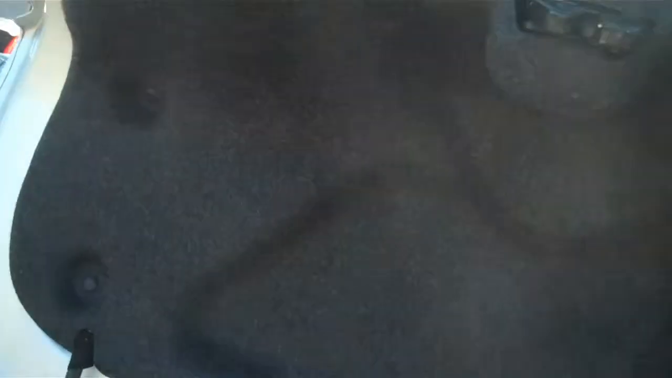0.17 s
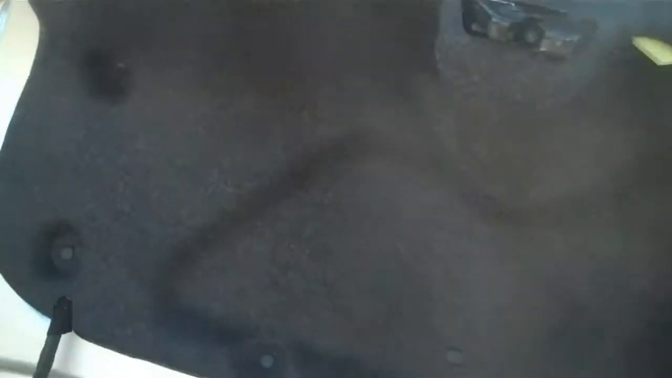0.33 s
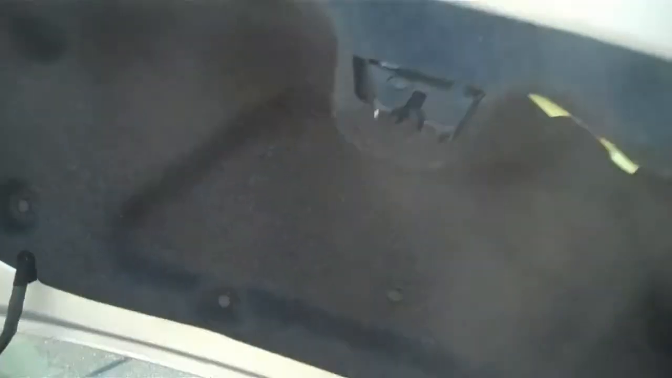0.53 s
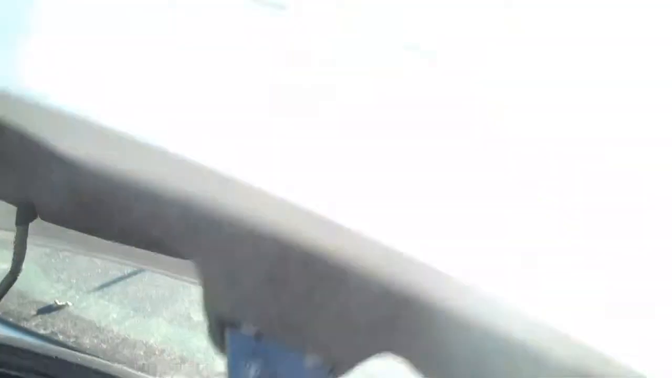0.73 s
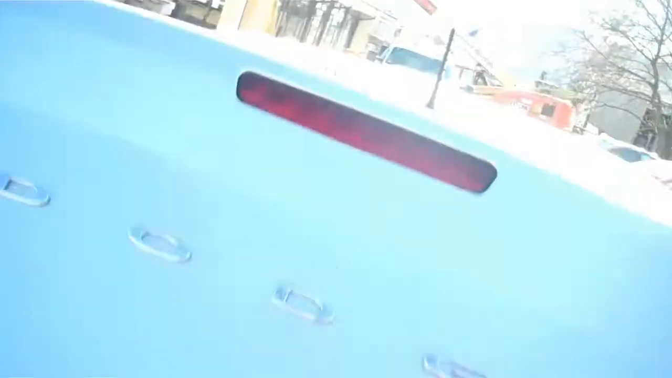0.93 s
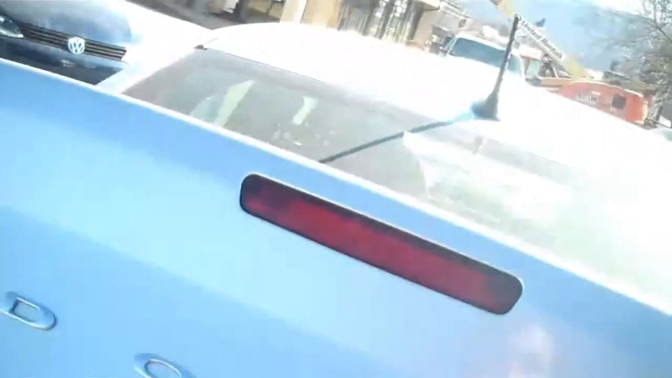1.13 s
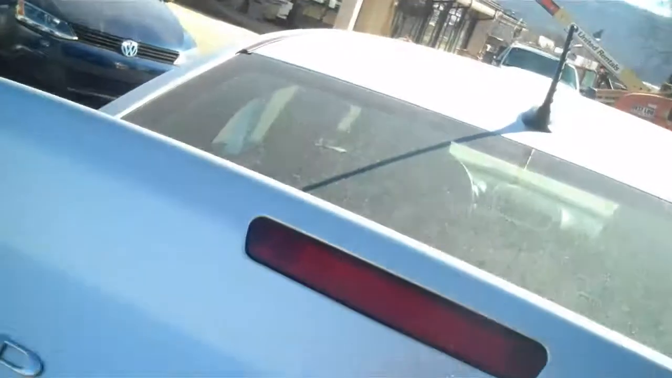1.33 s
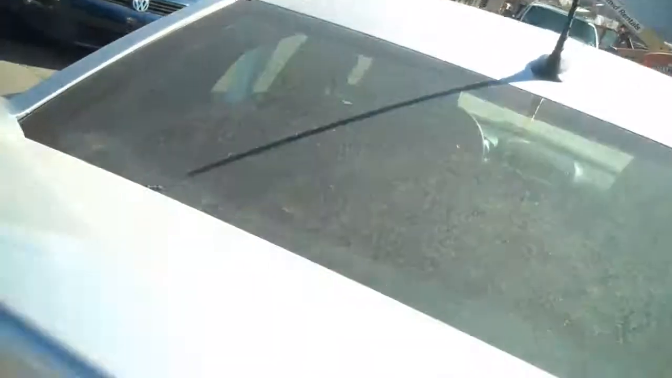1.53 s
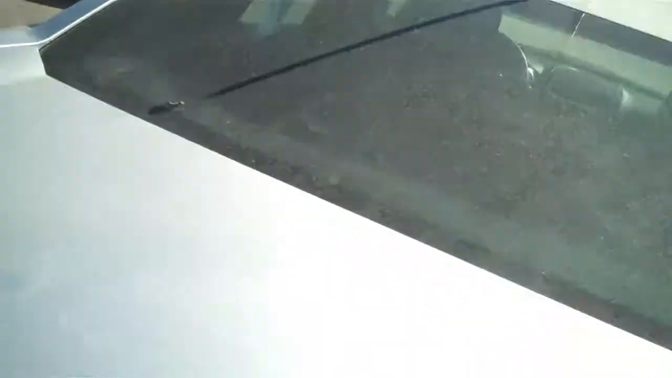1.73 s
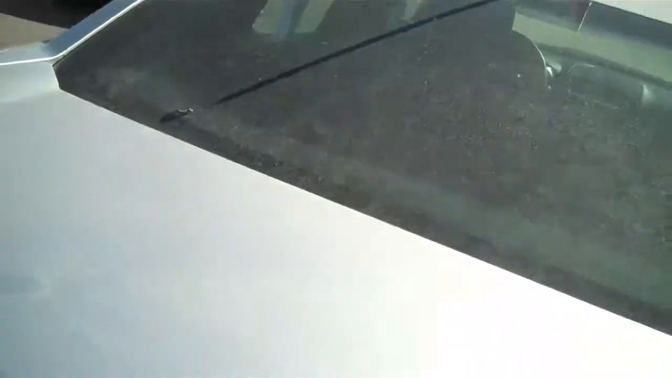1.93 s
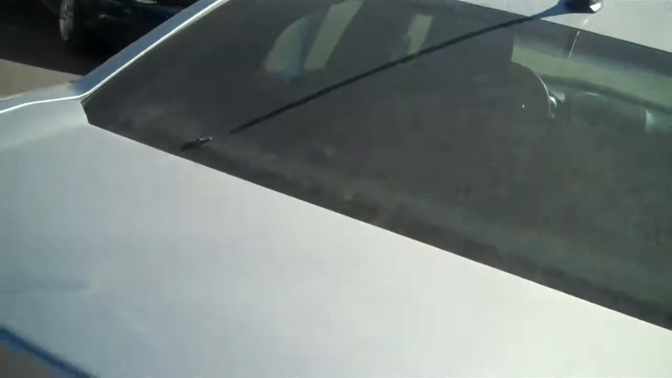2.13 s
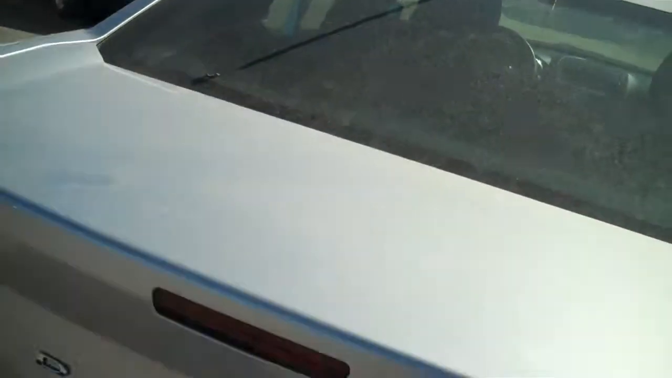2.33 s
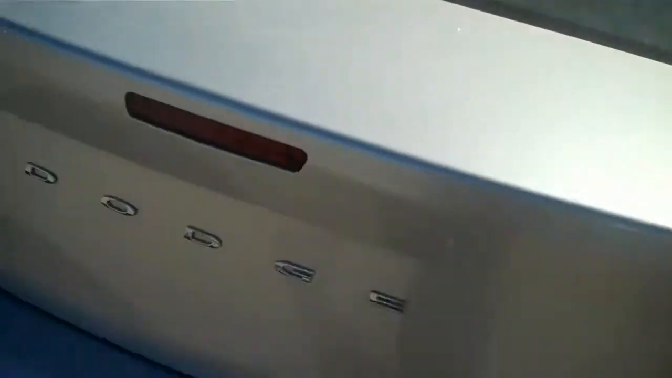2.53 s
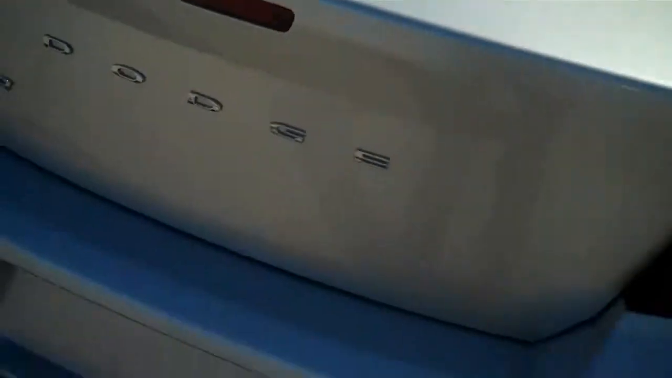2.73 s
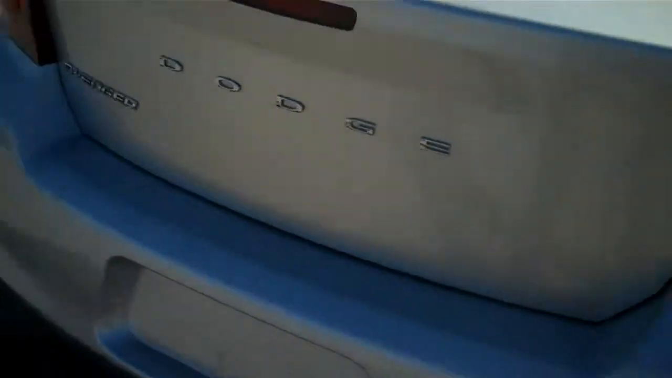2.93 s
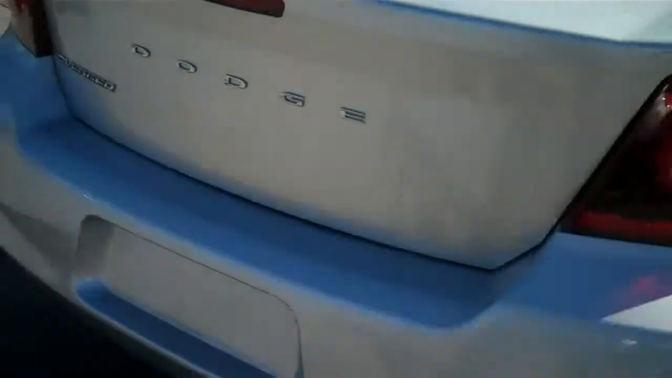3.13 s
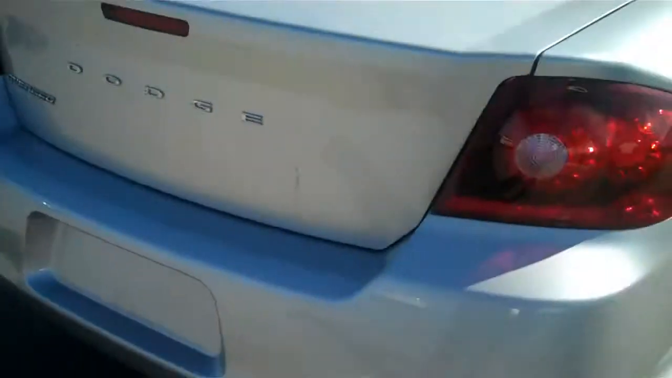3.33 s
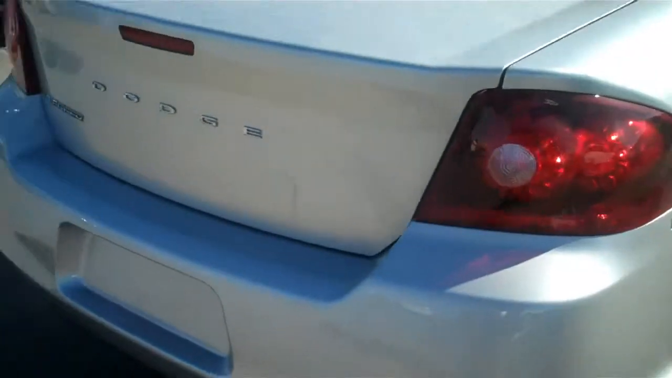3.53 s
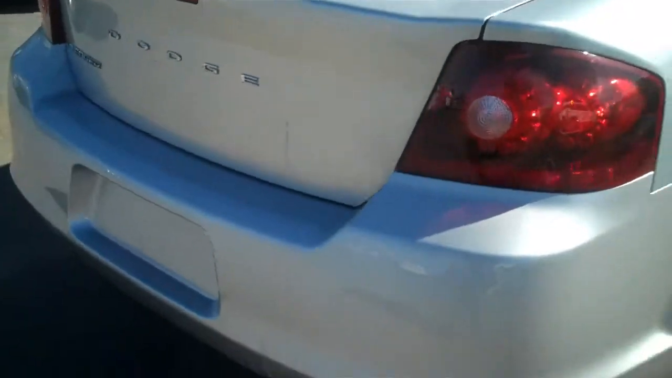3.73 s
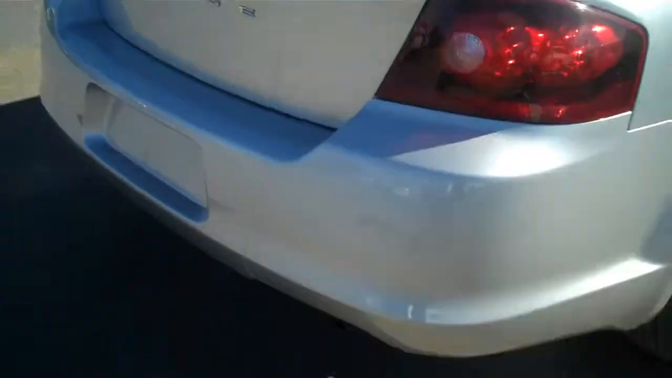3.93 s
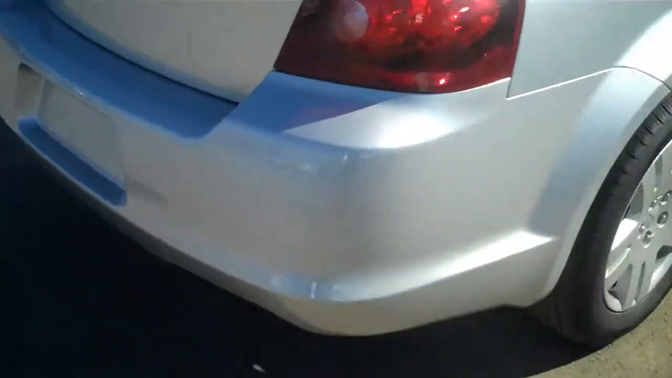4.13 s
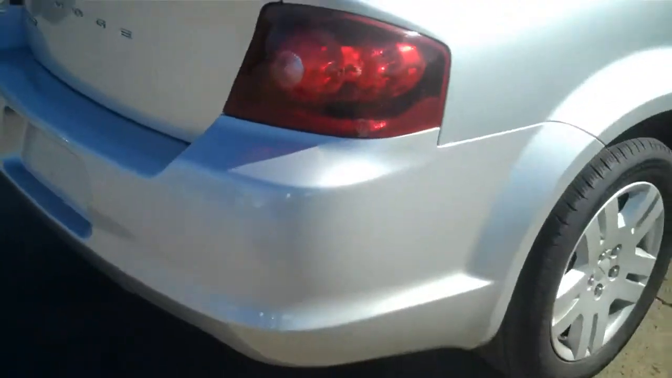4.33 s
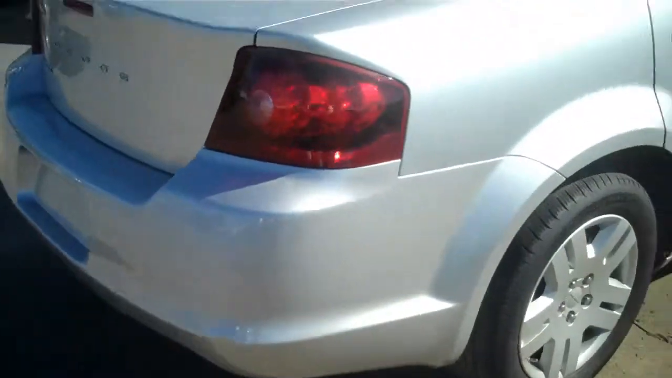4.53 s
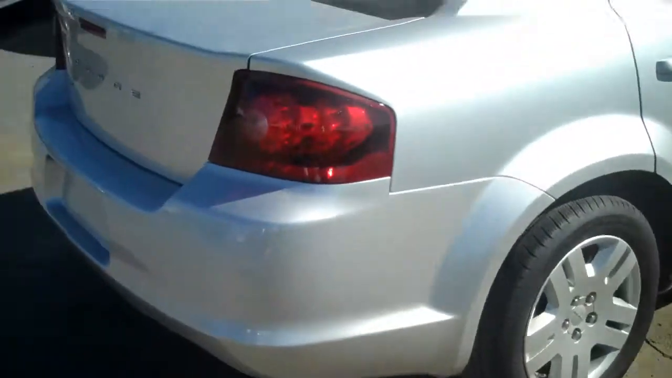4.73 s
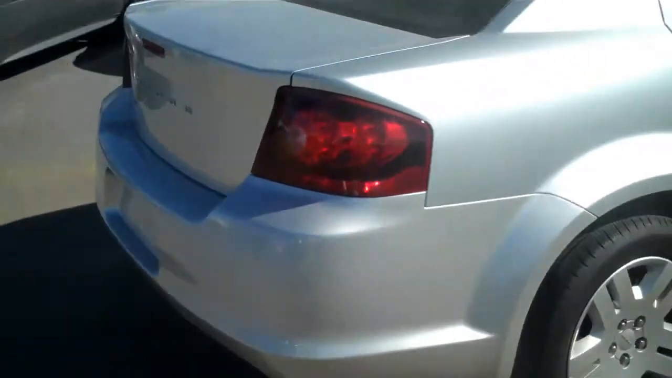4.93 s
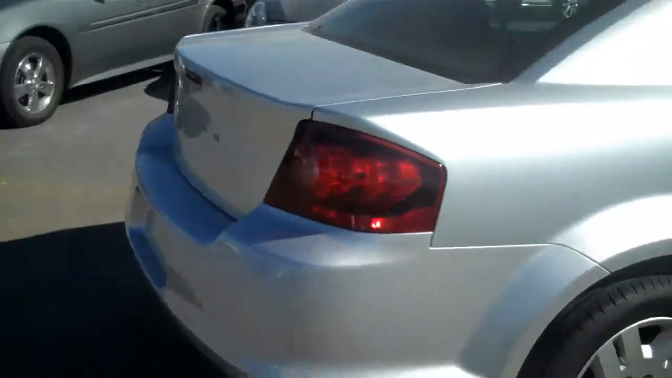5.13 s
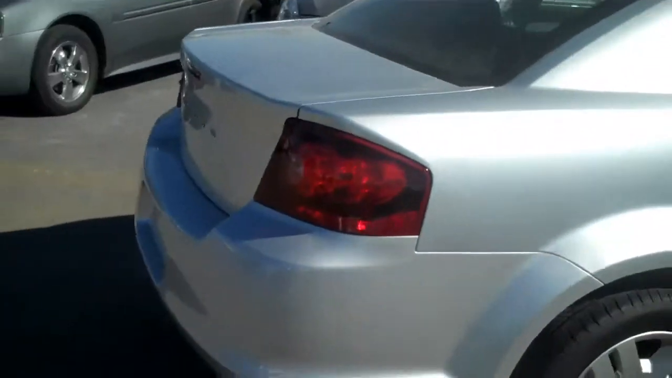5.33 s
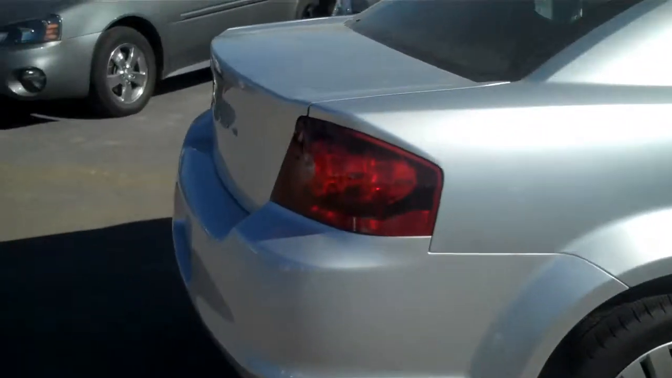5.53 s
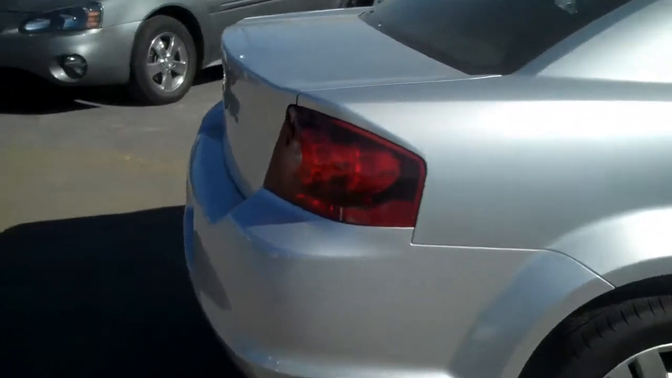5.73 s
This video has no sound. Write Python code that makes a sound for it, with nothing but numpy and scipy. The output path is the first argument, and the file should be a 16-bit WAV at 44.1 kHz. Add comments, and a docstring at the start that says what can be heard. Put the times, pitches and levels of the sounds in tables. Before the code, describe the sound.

Outdoors in a quiet car park, a hand-held camera picks up faint taps on a raised trunk lid and small plastic clicks. Just before two seconds the lid slams with a hard, distorted metallic thud, a brief latch rattle and short echoes. Afterwards come low traffic drone, swelling hiss, wind bumps, a thin faint whine and a few light clicks.

```python
"""An open car park: a car trunk lid is slammed shut close to a hand-held camera.
Shaped noise makes the far traffic, the camera motor's faint hum, a swelling hiss and low wind flutter; peaked
swings make gusts on each microphone port. Noise bursts and dying sines make knocks, taps, echoes of the slam,
case clicks and paired motor ticks; a thin sine comes and goes. The slam is a run of short blows ringing panel,
trunk air and car body. It overloads the microphone channel, whose gain drops and then recovers."""
import sys
import numpy as np
from scipy import signal
from scipy.io import wavfile
from scipy.ndimage import uniform_filter1d

SR = 44100
rng = np.random.default_rng(int(sys.argv[2]) if len(sys.argv) > 2 else 0)


def log_audio(samples):
    """Write samples as a 16-bit WAV file to the path given in sys.argv[1]."""
    # one column per channel
    frames = np.atleast_2d(samples).T
    # limit to full scale, then quantise
    limited = np.clip(frames, -1, 1)
    pcm = np.round(limited * 32767).astype(np.int16)
    wavfile.write(sys.argv[1], SR, pcm)


N = 254456
LEFT_LAG = 4  # samples by which the left port hears traffic, hum, hiss, knocks, taps and echoes later


def amp(db):
    """Decibels to gain."""
    return 10 ** (np.asarray(db) / 20)


def evened(x):
    """Scales to rms 1."""
    return x / np.sqrt(np.mean(x ** 2) + 1e-20)


def read(points, hz):
    """Columns of a spectrum table at frequencies hz, straight on a log axis."""
    f, *columns = np.transpose(points)
    return [np.interp(np.log(hz + 1), np.log(f + 1), column) for column in columns]


def follow(table):
    """Columns of a time curve at every sample."""
    s, *columns = np.transpose(table)
    return [np.interp(np.arange(N) / SR, s, column) for column in columns]


def colour(points):
    """Minimum-phase impulse response with the given spectrum: all its delay is causal."""
    hz = abs(np.fft.fftfreq(4096, 1 / SR))
    log_gain = np.log(amp(read(points, hz)[0]))
    spectrum = np.exp(np.conj(signal.hilbert(log_gain)))
    return np.fft.ifft(spectrum).real[:1024]


def add(mix, s, sound):
    """Mixes a sound in at time s, cut at the end of the mix."""
    part = mix[..., round(s * SR):][..., :sound.shape[-1]]
    part += sound[..., :part.shape[-1]]


def sides(db):
    """Left and right gains for a left-minus-right level difference."""
    return amp(np.array([db / 2, -db / 2]))


def ring(modes, seconds):
    """Sum of dying sines; successive modes in the list swing in opposite sense."""
    t = np.arange(round(seconds * SR)) / SR
    total = np.zeros(len(t))
    for k, (hz, db, t60) in enumerate(modes):
        total += (-1) ** k * amp(db - 60 * t / t60) * np.sin(2 * np.pi * hz * t)
    return total


def burst(t60, count=6000):
    """Two-sided noise that dies away, partly alike on both sides."""
    t = np.arange(count) / SR
    a, b = rng.standard_normal((2, count))
    return np.array([a, 0.86 * a + 0.7 * b]) * amp(-60 * t / t60)


def band(x, hz, width):
    """One broad resonance that keeps the level of white noise."""
    return signal.lfilter(*signal.iirpeak(hz, hz / width, SR), x) * np.sqrt(SR / (np.pi * width))


def noise(hz, gain_db, same, patchy_db):
    """Stereo noise from random short-time spectra with drifting louder and softer patches."""
    a, b, c, d, patches = rng.standard_normal((N // 128 + 5, 257, 5)).T
    patches = evened(uniform_filter1d(uniform_filter1d(patches, 6, 0), 24, 1))
    same = np.clip(same, 0, 1)[:, None]
    left = a + 1j * b
    shared = left * np.exp(2j * np.pi * hz * LEFT_LAG / SR)[:, None]
    right = same * shared + np.sqrt(1 - same ** 2) * (c + 1j * d)
    spectra = np.array([left, right]) * amp(gain_db[..., None] + patchy_db * patches)
    return evened(signal.istft(spectra, nperseg=512, noverlap=384)[1][:, :N])


# far traffic, with the camera motor's faint steady hum near 4.8 kHz:
# (f/Hz, relative level/dB per Hz, left-right/dB, likeness of the two sides 0-1)
TRAFFIC_AND_HUM_SPECTRUM = [(25, 11.5, 6, 0.95), (44.4, 23.5, -6, 0.8), (97, 2.5, -1, 0.88),
                            (234, -0.5, -1, 1), (430, -0.5, 0, 0.97), (887, 4.5, -0.5, 1),
                            (1570, -1.5, 0.5, 0.83), (2160, -7, 0.5, 0.44), (3750, -14, 2, 1),
                            (4500, -13.5, 6, .4), (4620, -10, -4, 0.79), (5040, -15, 6, 0.98),
                            (6000, -20.5, -3, 0.44), (7360, -23, 7.5, 0.25), (14100, -11.5, -10, .2),
                            (14300, -50, 0, .2)]
# slow rise and fall of both: (t/s, level/dB)
TRAFFIC_AND_HUM_LEVEL = [(0.0, -40.5), (1.068, -39.5), (1.45, -41), (1.72, -38.5), (4.08, -38.5),
                         (4.69, -37.5), (5.01, -39), (5.39, -36), (5.77, -37.5)]


def traffic_and_hum():
    """One coloured noise holds the low drone of far traffic and the motor's narrow band of hum."""
    hz = np.fft.rfftfreq(512, 1 / SR)
    level_db, pan_db, same = read(TRAFFIC_AND_HUM_SPECTRUM, hz)
    side_db = level_db + np.array([pan_db / 2, -pan_db / 2])
    return amp(follow(TRAFFIC_AND_HUM_LEVEL)[0]) * noise(hz, side_db, same, patchy_db=1.53)


# colour of the hiss: (f/Hz, relative level/dB per Hz)
HISS_SPECTRUM = [(300, -39), (1500, 4.5), (2500, 2.5), (4000, -2.5), (7000, -1), (13900, 0), (14300, -38)]
# swells of the hiss: (t/s, level/dB, added treble level/dB)
HISS_SWELL = [(0, -46, -3), (.25, -52, 4), (.6, -50.5, 5), (1.0, -46.5, -3), (1.25, -42.5, -3),
              (1.72, -43, -19), (2.2, -48, -8), (2.3, -42.5, -29), (2.65, -40, -25), (2.85, -35.5, -6),
              (3.08, -40, -2), (3.33, -34, -7), (3.42, -40, -5), (4.02, -42, 1), (4.22, -48.5, -5),
              (5.2, -48.5, -4), (5.77, -52, 1)]
HISS_CENTRED_DB, HISS_LEAN = -40.5, 0.44  # leans left as it grows: dB of left-right per dB above this level


def hiss():
    """Broad noise that swells and fades, with its treble above 9 kHz lifted by a changing amount."""
    hz = np.fft.rfftfreq(512, 1 / SR)
    steady = noise(hz, read(HISS_SPECTRUM, hz)[0], 0.21 + 0 * hz, patchy_db=2.2)
    swell_db, treble_db = follow(HISS_SWELL)
    treble = signal.lfilter(*signal.butter(2, 9000, "high", fs=SR), steady)
    lean = sides(HISS_LEAN * (swell_db - HISS_CENTRED_DB))
    return amp(swell_db) * lean * (steady + amp(treble_db) * treble)


# low flutter under and between the gusts: (t/s, level/dB)
BREEZE_LEVEL = [(0.0, -27.5), (0.19, -59), (0.756, -44), (1.15, -61), (1.45, -38), (1.72, -49),
                (2.2, -31.5), (2.34, -64), (2.8, -52), (3.23, -37.5), (3.5, -44.5), (3.91, -47.5),
                (4.46, -45), (4.81, -40.5), (5.09, -67), (5.77, -54)]


def breeze():
    """Light wind turbulence: low noise on each port, made lumpy by slow level swings."""
    slow = signal.lfilter(*signal.butter(2, 14, fs=SR), rng.standard_normal((2, N)))
    lumps = amp(3.5 * evened(slow))
    flutter = signal.lfilter(*signal.butter(2, [30, 200], "band", fs=SR), rng.standard_normal((2, N)))
    return amp(follow(BREEZE_LEVEL)[0]) * evened(flutter * lumps)


# ticks of the camera motor through the scene: (t/s, level/dB)
MOTOR_LEVEL = [(0, -53), (.6, -65), (1.12, -55), (1.2, -44.5), (1.7, -46), (1.75, -36.5), (2.0, -61),
               (2.25, -46.5), (2.5, -48), (2.7, -57.5), (5.77, -60.5)]
# frame modes rung by a tick, before random detuning: (f/Hz, level/dB, t60/s)
TICK_MODES = [(4820, 3, 0.0085), (7980, -3.5, 0.017), (6490, -9, 0.012), (9770, 5.5, 0.0045),
              (11300, -2, 0.0054)]
TURN_S, PAIR_S, FIRST_S = .04427, .0168, .0103  # time of a turn, gap inside a pair, first tick


def motor():
    """Two uneven scratchy ticks each turn; each rings the frame a little differently."""
    ticks = np.zeros(N)
    for s in np.arange(FIRST_S, N / SR, TURN_S):
        for offset in (0, PAIR_S):
            chance = rng.standard_normal((2, len(TICK_MODES)))
            modes = [(hz * (1 + 0.0098 * a), db + 6.8 * b, t60)
                     for (hz, db, t60), a, b in zip(TICK_MODES, *chance)]
            scratch = rng.standard_normal(300) * amp(-np.arange(300) * 0.026)
            tick = evened(np.convolve(scratch, ring(modes, .02)))
            add(ticks, s + offset, amp(1.3 * rng.standard_normal()) * tick)
    return sides(3.0)[:, None] * amp(follow(MOTOR_LEVEL)[0]) * evened(ticks)


# hand knocks on the raised lid: (t/s, ring level/dB, ring tilt about 1 kHz/dB per octave,
# snap level/dB, snap t60/s)
HAND_KNOCKS = [(0.0436, -49, 10.5, -30.5, 0.083), (0.0496, -54, 9, -38, 0.15),
               (0.111, -41, 0.5, -19.5, 0.052), (.115, -47, -2, -25.5, 0.11), (0.1192, -41.5, 5, -41, 0.13)]
# modes of the raised lid: (f/Hz, level/dB, t60/s)
RAISED_LID_MODES = [(521, -6, 0.2), (605, 4.5, 0.2), (790, 8, 0.049), (1083, 4.5, 0.074), (1363, -15, .06),
                    (1580, -5, 0.067), (1610, 0, 0.11), (1840, -4.5, 0.082), (2840, -30, 0.055),
                    (3080, -9, .05)]


def knocks():
    """Short scratchy contacts ring the raised lid; a harder contact favours the high modes."""
    out = np.zeros((2, N))
    for s, ring_db, tilt_db, snap_db, t60 in HAND_KNOCKS:
        modes = [(hz, db + tilt_db * np.log2(hz / 1000), ring_t60) for hz, db, ring_t60 in RAISED_LID_MODES]
        contact = 0.68 * burst(0.0086)[0, :1500] + 4.4 * signal.unit_impulse(1500)
        add(out, s, amp(ring_db) * np.convolve(contact, ring(modes, .15)))
        snap = burst(t60)
        add(out, s, amp(snap_db) * (0.78 * snap + band(snap, 1100, 2000)))
    return out


# short taps and scuffs, and echoes of the slam from 1.99 to 2.10 s:
# (t/s, level/dB, centre f/Hz, width f/Hz, t60/s, relative treble level/dB, left-right/dB)
TAPS_AND_ECHOES = [(0.077, -37.5, 1780, 900, 0.08, 8, 0.5), (0.2018, -46, 3040, 800, 0.053, 11, 4),
                   (0.637, -37.5, 2300, 1500, 0.072, -10, 2), (1.244, -31.5, 770, 695, 0.032, -20, 0),
                   (1.699, -33.5, 2000, 1510, 0.032, -18, 6), (1.9932, -17, 1820, 1840, 0.047, -5, 3),
                   (1.9946, -18.5, 1670, 1200, 0.054, 4, -1), (2.045, -25.5, 1890, 493, .05, -12, 3),
                   (2.101, -29, 1720, 870, 0.058, -4, 2), (2.3555, -27, 680, 400, 0.024, -30, 0),
                   (2.368, -29.5, 1120, 600, 0.041, -28, 1), (2.45, -33, 880, 595, 0.035, -29, 0),
                   (3.0972, -26, 1820, 500, 0.032, -0.5, -1), (4.489, -39, 1500, 2200, 0.3, -5, 4),
                   (4.786, -25, 870, 250, .03, -35, 3)]


def taps_and_echoes():
    """Each is a noise burst in one broad resonance, plus some of the unfiltered burst for treble."""
    out = np.zeros((2, N))
    for s, db, hz, width, t60, treble_db, pan_db in TAPS_AND_ECHOES:
        scuff = burst(t60)
        onset = scuff + 12.8 * signal.unit_impulse(scuff.shape[1])  # the onset rings the resonance
        tone = band(band(onset, hz, width), hz, 4.8 * width)
        tone *= np.sqrt(np.pi * 2.5 * width / SR)  # a narrower resonance passes less of the burst
        add(out, s, amp(db) * sides(pan_db)[:, None] * (tone + amp(treble_db) * scuff))
    return out


PUFF_COUNT = 14
PUFF_DB, PUFF_SPREAD_DB, PUFF_HZ, PUFF_S = -44, 6, 123, .017  # level and spread, base pitch, length


def puffs():
    """Faint gusts at random moments, as rows like those of the gust table."""
    when, port, size, pitch = rng.random((PUFF_COUNT, 4)).T
    level_db = PUFF_DB + PUFF_SPREAD_DB * (2 * size - 1)
    return zip(when * N / SR, port.round(), level_db, PUFF_HZ * (.8 + .5 * pitch), PUFF_S + 0 * when)


# gusts on the ports, two of them during the slam:
# (t/s, port 0 left - 1 right, level/dB, heard pitch f/Hz, length either side of centre/s)
PORT_GUSTS = [(0.143, 0.34, -35.5, 297, 0.056), (0.175, 1, -25, 83.7, 0.058),
              (0.435, 0.94, -25, 159, 0.012), (0.594, 0.98, -35, 130, 0.013),
              (0.716, 0.89, -30, 148, 0.017), (1.348, 1, -24.5, 184, 0.03),
              (1.494, 0.15, -29.5, 233, 0.065), (1.555, 1, -33, 96, 0.019), (1.6, 1, -28.5, 189, 0.05),
              (1.625, 0.93, -26, 136, 0.028), (1.715, 0.84, -33, 153, 0.017), (1.739, 1, -23, 117, 0.0052),
              (1.81, 1, -8, 120, 0.01), (1.858, 0.7, -12, 120, 0.008), (2.034, 0.83, -23, 157, 0.053),
              (2.158, 0.8, -20, 140, 0.061), (2.193, 1, -26, 104, 0.0071), (2.697, 0.94, -30.5, 167, 0.048),
              (3.011, 1, -28.5, 143, 0.0082), (3.134, 0.11, -25.5, 187, 0.023),
              (3.152, 0.44, -31.5, 302, 0.005), (3.228, 0, -27.5, 170, 0.0093),
              (3.267, 0.19, -32, 140, 0.02), (3.308, 0.14, -23.5, 150.7, 0.05),
              (3.323, 0.082, -20.5, 202, 0.03), (3.337, 0.11, -25, 168, 0.02), (3.39, 0, -27, 104, 0.015),
              (3.671, 0, -28, 126, 0.019), (4.711, 0.96, -20.5, 99, 0.0083), (4.726, 1, -24, 120, 0.0098),
              (4.743, 0.89, -28, 170, 0.022), (4.815, 1, -27.5, 158, 0.024)]
EDDY_SHARE = 0.81  # peaked eddies come slower than the pitch one hears


def gusts():
    """Each gust is a few uneven, peaked pressure swings as eddies pass the ports."""
    out = np.zeros((2, N + 3000))  # starts early, as each gust is centred on its time
    t = np.arange(-3000, 3000) / SR
    for s, port, db, hz, length in [*PORT_GUSTS, *puffs()]:
        wander = evened(uniform_filter1d(rng.standard_normal(6000), 300))
        turns = np.cumsum(EDDY_SHARE * hz * amp(3.07 * wander)) / SR
        swing = np.exp(2.1 * np.cos(2 * np.pi * (turns - turns[3000])))  # eddies arrive as peaks
        swing = rng.choice([-1, 1]) * evened(swing - swing.mean())
        # an 8.5 ms core, plus half as much over the gust's own length
        envelope = np.exp(-(t / 0.0085) ** 2) + .5 * np.exp(-(t / length) ** 2)
        port = np.clip(port, 0, 1)
        add(out, s, np.outer([1 - port, port], amp(db) * swing * envelope))
    return out[:, 3000:]


# a thin far tone that comes and goes: (start t/s, end t/s, peak level/dB)
WHINE_SPANS = [(.76, 0.942, -51), (1.99, 2.37, -50.5), (2.55, 3.117, -45.5), (3.16, 3.447, -45),
               (3.58, 3.93, -51.5), (4.27, 4.458, -47.5), (4.52, 4.732, -47.5), (4.8, 5.29, -47.5)]
WHINE_HZ = 1536


def whine():
    """A slightly unsteady sine that fades in and out."""
    out = np.zeros(N)
    for start, end, db in WHINE_SPANS:
        count = round((end - start) * SR)
        drift_hz = 3.9 * evened(uniform_filter1d(rng.standard_normal(count), 2000))
        tone = np.sin(2 * np.pi * np.cumsum(WHINE_HZ + drift_hz) / SR)
        add(out, start, amp(db) * signal.windows.tukey(count, .3) * tone)
    return out


# clicks of the camera case: (t/s, snap level/dB, case rattle level/dB, t60/s, left-right/dB)
CASE_CLICKS = [(1.1193, -37, -31.5, .06, 5), (1.1307, -27, -29, 0.009, 6),
               (1.1357, -18.5, -31, 0.014, 12.5), (1.1391, -20, -20, 0.0076, 1), (1.142, -34, -34, 0.1, 6),
               (1.1543, -32, -25.5, .008, 5), (1.2041, -28, -31, 0.034, 5.5), (4.1375, -28, -35, 0.0036, 9),
               (4.1404, -18.5, -36.5, 0.011, 2), (4.1452, -41, -35, 0.0051, 9), (4.187, -38.5, -55, .01, 5)]
CASE_HZ, CASE_WIDTH_HZ = 2790, 800


def clicks():
    """Plastic snaps: a bright scratch and the duller rattle of the case."""
    out = np.zeros((2, N))
    for s, snap_db, case_db, t60, pan_db in CASE_CLICKS:
        scratch = burst(t60)
        scratch /= np.sqrt((scratch[:, :20] ** 2).mean(1, keepdims=True))  # even onset
        scratch[:, 0] += 6.  # the snap itself
        snap = amp(snap_db) * band(scratch, 8200, 3300)
        rattle = amp(case_db) * band(band(scratch, CASE_HZ, CASE_WIDTH_HZ), CASE_HZ, 8300)
        add(out, s, sides(pan_db)[:, None] * (snap + rattle))
    return out


# colour of the rumble: (f/Hz, level/dB)
RUMBLE_COLOUR = [(40, 8), (100, 0), (300, -1.5), (900, -7), (1400, -9), (3000, -6), (9000, -30)]
# the car rumbling on: (f/Hz, t60/s)
RUMBLE_DECAY = [(40, 0.54), (150, 0.45), (400, 0.4), (1200, 0.18), (3000, 0.18), (9000, 0.29)]


def car_tail():
    """Half a second of coloured noise, each frequency dying at its own rate as the car rumbles on."""
    hz, t, spectra = signal.stft(burst(99., count=SR // 2), SR, nperseg=512)
    spectra *= amp(read(RUMBLE_COLOUR, hz)[0][:, None])
    spectra *= amp(-60 * t / read(RUMBLE_DECAY, hz)[0][:, None])
    return signal.istft(spectra, SR, nperseg=512)[1][:, :SR // 2]


# blows of the lid on seal, latch and stops:
# (t/s, push level/dB, nominal contact/ms, crack level/dB, t60 of the crack's midrange/s)
LID_BLOWS = [(1.7804, -19, 0.59, -31, 0.11), (1.7858, -5.5, 0.48, -8, 0.079),
             (1.7899, -9, 0.21, -1.5, 0.073), (1.7946, 4, 1.1, -5, 0.13), (1.7985, 13.5, 2.04, 1, 0.096),
             (1.8037, 8.5, 3.25, -5.5, 0.024), (1.8092, 1.5, 3.6, -4, 0.028), (1.8143, -11, 1.7, -3, 0.028),
             (1.8267, -14, 1.8, -13, 0.079), (1.8440, 1, 1.44, -17, 0.15), (1.8545, -27.5, 2.7, -48, 0.044),
             (1.8756, -23, 2, -24, 0.033)]
# lid panel modes: (f/Hz, level/dB, t60/s)
PANEL_MODES = [(272, -8, 0.19), (320, -11.5, 0.23), (362, -12, 0.17), (506, -38, 0.48), (600, -11.5, 0.21),
               (683, -13, 0.1), (790, -26, 0.21), (875, -4, 0.14), (953, -3, 0.19), (1100, -19, 0.12),
               (1200, -20, 0.25), (1237, -3, 0.16), (1540, -20, 0.16), (1720, -30, 0.2), (1830, -29, 0.13),
               (2051, -32, 0.19), (2130, -27, 0.18), (2400, -28, 0.19), (2350, -30, 0.25),
               (2240, -18, 0.22), (2719, -33, 0.2), (2770, -3, 0.082), (3050, -29, 0.13), (3050, -19, 0.1)]
# trunk air and car body modes: (f/Hz, level/dB, t60/s)
TRUNK_MODES = [(65, 8, 0.085), (43.5, -23, 0.35), (80.7, 1.5, 0.28), (103, -2, 0.27), (128.5, -7.5, 0.48),
               (165, -4.5, 0.12), (223.3, -7.5, 0.29), (243, -11, 0.51)]
# colour of the crack: (f/Hz, level/dB)
CRACK_COLOUR = [(150, -6), (450, 2.5), (700, 9), (1200, 11.5), (1800, 1.5), (2500, 0.5), (5000, -1.5),
                (9000, -2), (12000, 3.5), (15500, -10)]


def slam():
    """Each blow pushes the panel and trunk modes and cracks; the whole car rumbles on."""
    push, crack = np.zeros(N), np.zeros((2, N))
    for s, push_db, ms, crack_db, t60 in LID_BLOWS:
        contact = np.hanning(round(ms * SR / 1000) + 3)  # a longer contact drives only the low modes
        add(push, s, amp(push_db) * contact / contact.sum())
        midrange = 0.32 * band(burst(t60), 810, 1700)
        add(crack, s, amp(crack_db) * (burst(0.64 * t60) + midrange))  # treble dies first
    crack = signal.oaconvolve(crack, colour(CRACK_COLOUR)[None], axes=1)[:, :N]
    panel = amp(-0.5) * ring(PANEL_MODES, .5)
    trunk = amp(-11.5) * sides(-0.5)[:, None] * ring(TRUNK_MODES, .5)
    tail = car_tail()
    pushed = signal.oaconvolve(push[None], panel + trunk + amp(2) * tail, axes=1)[:, :N]
    rumble = amp(-26.5) * signal.oaconvolve(crack.mean(0)[None], tail, axes=1)[:, :N]
    return pushed + crack + rumble


# loose latch parts that clack after the slam's first blows: (t/s, level/dB)
LATCH_CLACKS = [(1.8273, -24), (1.8439, -25), (1.8545, -36), (1.8757, -30), (1.893, -42), (1.903, -46)]
# modes of the latch parts: (f/Hz, level/dB, t60/s)
LATCH_MODES = [(2500, -0.5, .015), (3620, -4, .012), (4660, -7, .012), (6330, -5, 0.016), (7600, -8, 0.011)]


def latch():
    """Each clack is a short scratch into the latch modes."""
    out = np.zeros((2, N))
    for s, db in LATCH_CLACKS:
        scratch = burst(.008, count=600)[:1]
        clack = signal.oaconvolve(scratch, ring(LATCH_MODES, 0.019)[None], axes=1)
        add(out, s, amp(db) * evened(clack))
    return out


def scene():
    """All sources, before the ports; the lid lies straight ahead, knocks, taps and echoes to one side."""
    air = traffic_and_hum() + hiss() + breeze() + gusts() + whine()
    aside = knocks() + taps_and_echoes()
    aside[0] = np.roll(aside[0], LEFT_LAG)
    return air + motor() + aside + clicks() + slam() + latch()


# the two microphone ports, each a small resonant cavity: (f/Hz, level/dB)
LEFT_PORT_COLOUR = [(3000, -0.5), (4500, -0.5), (6000, 5.5), (7400, 12), (8500, 3), (10000, -7.5),
                    (12600, -15), (14000, -12.5)]
RIGHT_PORT_COLOUR = [(3000, -1.5), (4500, 1), (5300, 4), (6200, 11), (7300, -1.5), (8500, -9),
                     (10000, -20.5), (14000, -28.5)]
EDGE_HZ = 15600  # upper band limit


def record(dry):
    """Port resonances, bass cut, gain control that recovers after loud sound, overload, band limit."""
    ports = (LEFT_PORT_COLOUR, RIGHT_PORT_COLOUR)
    heard = np.array([signal.oaconvolve(x, colour(port))[:N] for x, port in zip(dry, ports)])
    heard = signal.lfilter(*signal.butter(2, 32, "high", fs=SR), heard)  # bass cut
    power = signal.lfilter([.002], [1, -.998], (heard ** 2).mean(0))
    power_db = 10 * np.log10(power + 1e-12)
    over_db = np.maximum(power_db + 12.0, 0) * 0.95  # gain cut wanted above -12 dB
    regained_db = np.arange(N) * 32.5 / SR  # recovers 32.5 dB per second
    cut_db = np.maximum.accumulate(over_db + regained_db) - regained_db
    cut_db = signal.lfilter([.001], [1, -.999], cut_db)  # too slow to catch the first blows
    clipped = np.clip(heard / amp(cut_db), -.97, .97)
    low_pass = signal.firwin(511, EDGE_HZ, window=("kaiser", 9), fs=SR)
    return signal.oaconvolve(clipped, low_pass[None], "same")


dry = scene()
out = record(dry)
log_audio(out)
```